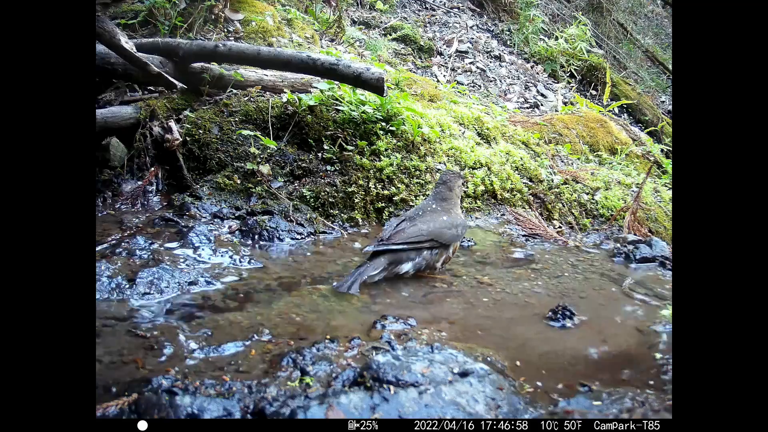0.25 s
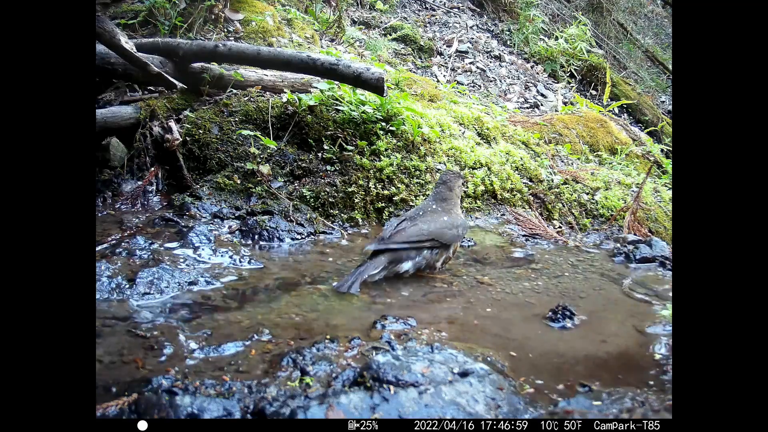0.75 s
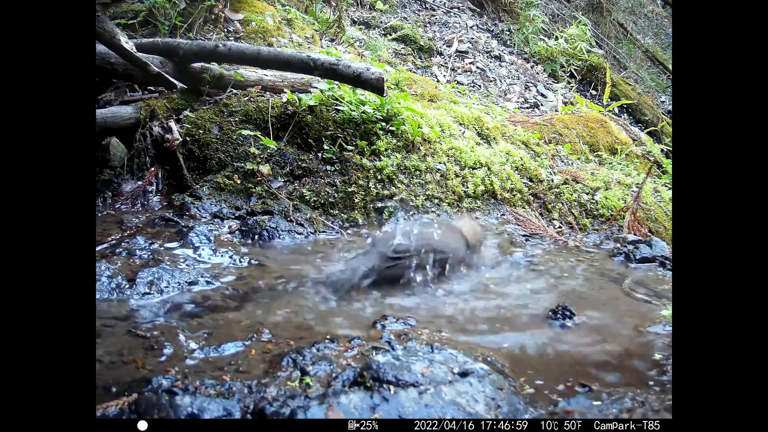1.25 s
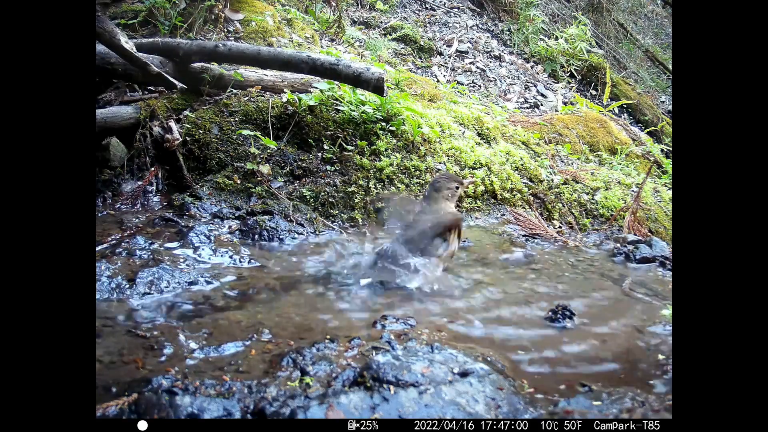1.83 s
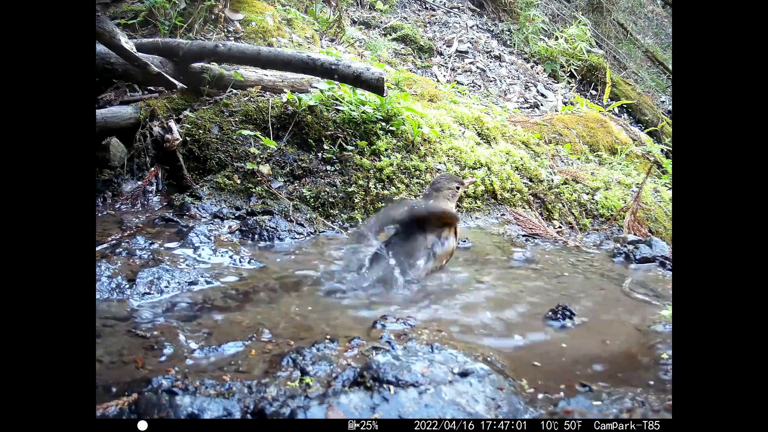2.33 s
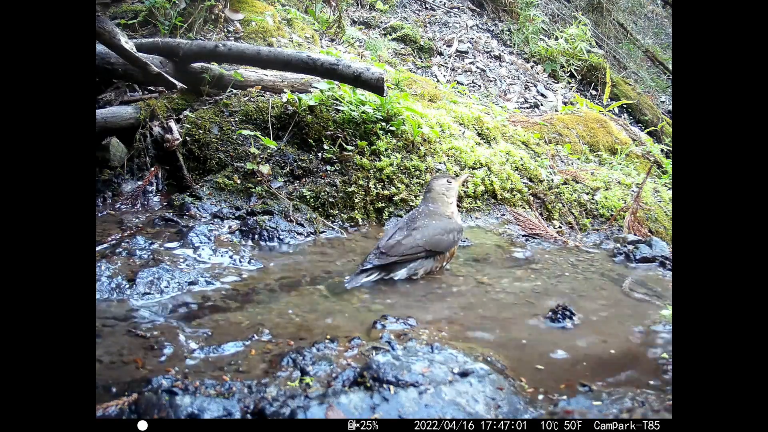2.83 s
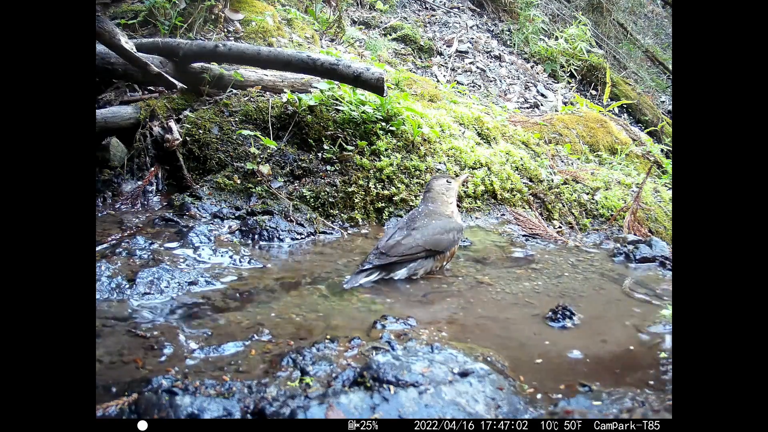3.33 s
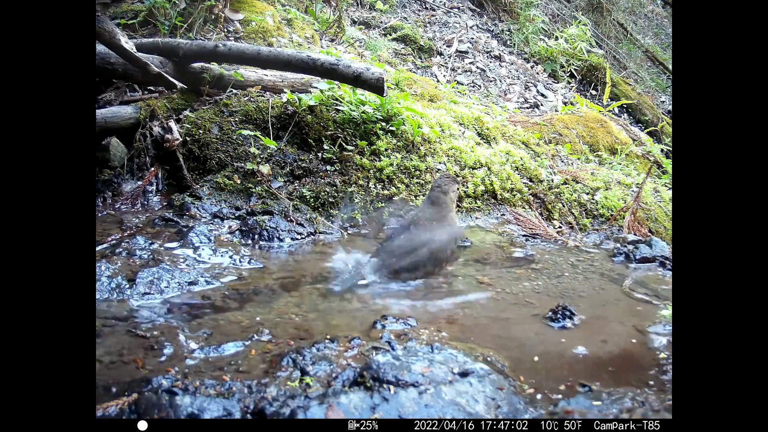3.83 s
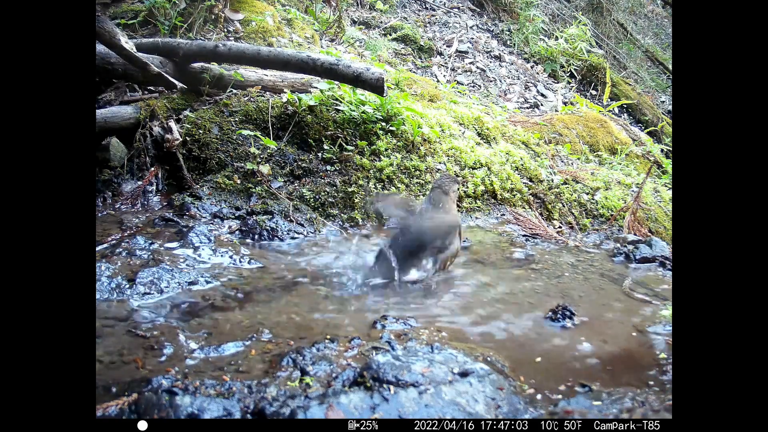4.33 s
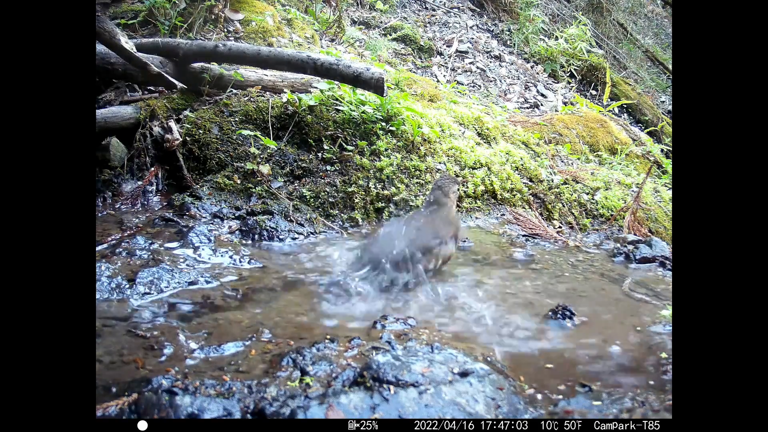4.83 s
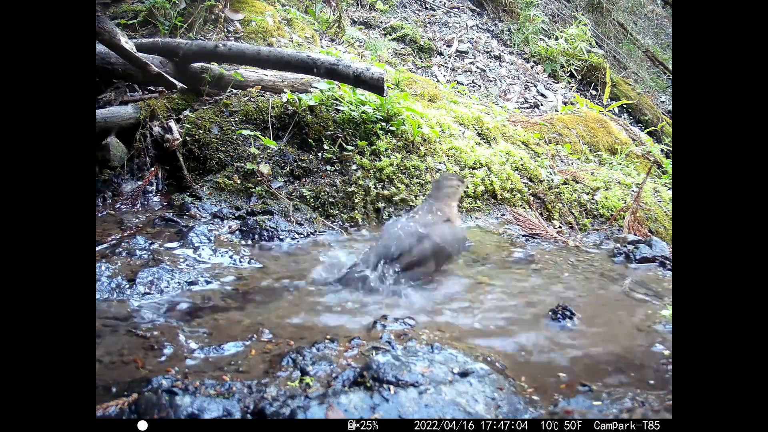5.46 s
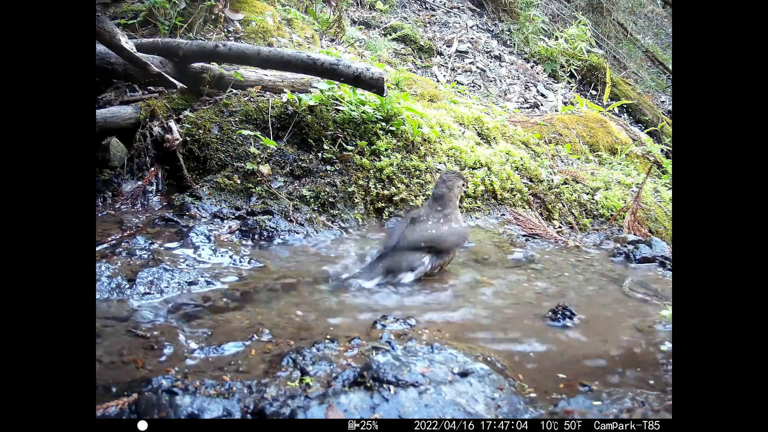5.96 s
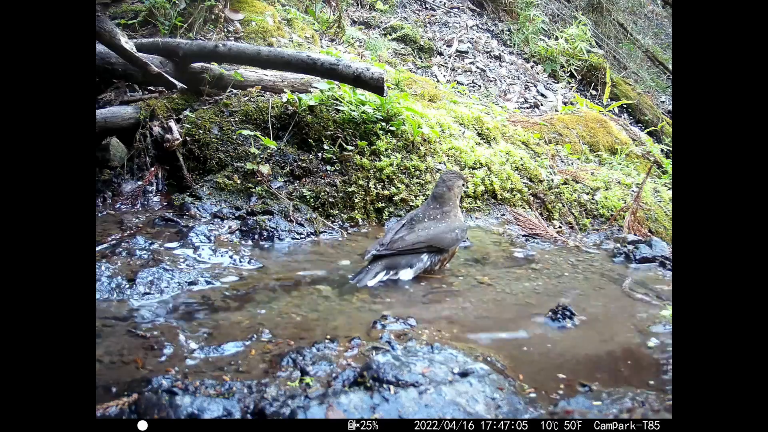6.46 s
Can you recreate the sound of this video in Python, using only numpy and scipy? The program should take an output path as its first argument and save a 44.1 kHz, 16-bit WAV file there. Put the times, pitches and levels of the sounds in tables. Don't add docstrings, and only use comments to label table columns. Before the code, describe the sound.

Heard from inside a small sealed plastic housing beside a forest pool: steady hiss and faint low rustle, with light muffled taps as a bird flicks water. A few hollow ringing plunks come around two seconds, then a near-quiet pause. Flicking resumes with more taps and patter, building into a rapid run of loud, boxy knocks and slops, then scattered last hits.

```python
import sys
import numpy as np
from scipy import signal
from scipy.fft import rfft, irfft
from scipy.io import wavfile

SR = 44100
rng = np.random.default_rng(int(sys.argv[2]) if len(sys.argv) > 2 else 0)


def log_audio(samples):
    frames = np.atleast_2d(samples).T
    limited = np.clip(frames, -1, 1)
    pcm = np.round(limited * 32767).astype(np.int16)
    wavfile.write(sys.argv[1], SR, pcm)


def ratio_of_db(decibels):
    return 10 ** (np.asarray(decibels, float) / 20)


N = 294878

# f/Hz, level/dB
SHELL = [(670, 3), (780, -7), (945, -1), (1090, 0.5), (1280, -4.5), (1660, 3.5), (1950, 6.5)]
# t/s, then level/dB of each lid mode from low to high
RINGS = [(0.901, -56.5, -82, -57, -53), (1.715, -64, -61, -53, -53.5), (1.802, -78, -46, -56, -49.5),
         (2.0096, -71, -35, -66, -62), (2.0563, -30.5, -30.5, -43.5, -60), (2.0929, -38.5, -30, -43, -65),
         (2.128, -46, -41, -66, -69), (4.214, -62, -52, -54, -70), (4.317, -63, -63, -52, -63),
         (2.7318, -62, -37, -44, -71), (4.761, -75, -47, -47, -41.5), (4.9886, -73, -34.5, -38.5, -69),
         (5.4226, -39, -33, -35.5, -52)]


def rms_one(x):
    return x / np.sqrt(np.mean(x ** 2) + 1e-20)


def peak_one(x):
    return x / np.max(np.abs(x))


def in_time(rows):
    s, value = np.transpose(rows)
    return np.interp(np.arange(N) / SR, s, value)


def band(x, low_hz, high_hz, order=2):
    return signal.sosfilt(signal.butter(order, [low_hz, high_hz], "band", fs=SR, output="sos"), x)


def drift(rate):
    knots = rng.standard_normal(int(N / SR * rate) + 2)
    return np.interp(np.arange(N) / SR * rate, np.arange(len(knots)), knots)


def coloured(spectrum):
    hz, level_db = np.transpose(spectrum)
    grid = np.maximum(np.arange(N // 2 + 1) * SR / N, 1)
    gain = ratio_of_db(np.interp(np.log(grid), np.log(hz), level_db))
    return rms_one(irfft(rfft(rng.standard_normal(N)) * gain, N))


def swell(t, rise, fall):
    return np.where(t < 0, ratio_of_db(-9 * (t / rise) ** 2), ratio_of_db(-9 * np.abs(t / fall) ** 1.2))


def hits():
    # peak t/s, level/dB, centre f/Hz, fall/ms, bright crack/dB
    knocks = [(3.9435, -33, 804, 0.85, -50), (5.102, -24, 850, 2.7, -44), (5.1493, -37.5, 1080, 4.7, -3.5),
              (5.154, -38.5, 925, 7, -18), (5.165, -37, 716, 4.8, -16), (5.178, -34, 990, 0.68, -40),
              (5.2077, -33, 930, 1.3, -14), (5.242, -29.5, 850, 2.4, -14), (5.4361, -25, 824, 6.4, -29),
              (5.4417, -21, 770, 6, -45), (5.4502, -18, 616, 0.88, -29), (5.4815, -36, 1090, 1.5, -13),
              (5.521, -32, 830, 1.4, -38), (5.6252, -31.5, 1090, 1.5, -21), (5.6696, -30.5, 914, 2.3, -19),
              (5.6724, -27, 796, 3.2, -13.5), (5.7093, -25.5, 906, 1.9, -10),
              (5.7688, -25.5, 903, 0.6, -18), (5.771, -29.5, 847, 3.3, -16), (5.8257, -20, 910, 1.5, -46),
              (6.1396, -32.5, 1020, 1.1, -17), (6.3483, -20.5, 1050, 0.63, -18),
              (6.3531, -31.5, 900, 0.61, -30), (6.3611, -28, 1090, 2.2, -17.5)]
    # peak t/s, level/dB,
    # centre f/Hz, fall/ms
    dull_taps = [(0.3415, -58.5, 950, 7.7), (.811, -47.5, 1060, 5.6), (0.8935, -51.5, 1120, 4.5),
                 (0.9127, -57, 950, 7.7), (1.058, -54, 1070, 7.8), (1.6267, -57.5, 870, 2.3),
                 (1.862, -57, 980, 1.1), (2.1452, -53, 794, 4.8), (2.1746, -52, 900, 5.6),
                 (2.3093, -47.5, 950, 0.64), (2.3389, -54, 970, 6.1), (2.704, -56.5, 1010, 6.2),
                 (2.8832, -49.5, 955, 0.6), (3.8014, -49, 1000, 1.8), (3.81, -47.5, 960, 2),
                 (3.933, -43.5, 910, 2.3), (3.9585, -45, 800, 1.5), (4.032, -54, 910, 6.6),
                 (4.39, -50, 870, 6.7), (1.343, -58, 980, 9.4), (.293, -62, 1050, 3), (3.4, -64, 960, 5.5),
                 (4.8908, -49.5, 1200, 1.4), (4.925, -43.5, 1170, 2.6), (4.932, -53, 1110, 7.9),
                   (5.0305, -49.5, 903, 14), (5.0895, -42, 830, 0.92), (5.1321, -40, 1030, 4.8),
                   (5.1573, -39, 990, 6.2), (5.28, -41, 950, 1.2), (5.3808, -52.5, 860, 7.5),
                   (5.4232, -31.5, 1000, 2), (5.4847, -26.5, 930, 4.4), (5.552, -38, 950, 0.72),
                   (5.6006, -41.5, 970, 1.4), (5.6181, -48, 990, 1.1), (5.633, -46, 950, 4.6),
                   (5.6553, -40, 960, 1.2), (5.856, -48.5, 870, 2.6), (5.8994, -48.5, 950, 5.8),
                   (6.1016, -37.5, 1030, 0.56), (6.1074, -39, 910, 0.71), (6.147, -40.5, 990, 1.1),
                   (6.371, -42, 970, 1.8), (6.208, -35.5, 950, 5.8), (6.067, -57, 950, 1.5),
                   (6.473, -52, 970, 1.4),
                 (.787, -58.5, 1030, 4.5), (.828, -67, 1050, 3.6), (5.866, -50, 800, 3.6),
                (.939, -63, 1010, 3.8), (.952, -64, 1050, 4.4), (.971, -59, 1100, 6), (1.037, -59, 1140, 4),
                (1.075, -68, 1030, 7), (.045, -64, 1090, 5.7), (1.299, -59.5, 930, 3.2),
                (1.313, -61, 1030, 4.5), (1.332, -67, 1000, 3), (1.44, -68, 1030, 6), (2.021, -48, 950, 3),
                (3.902, -60, 950, 2), (3.919, -57, 900, 4.9), (3.94, -51, 800, 1.2), (3.947, -52, 910, 4.6),
                (4.055, -65, 950, 2), (5.227, -53, 850, 2.8), (5.4585, -38, 695, 1.6),
                (4.243, -55, 950, 6.2), (4.256, -75, 950, 5.4), (4.291, -66, 930, 3.6),
                (4.37, -56, 1030, 4), (4.423, -53, 850, 3), (4.846, -50, 900, 7.5), (4.898, -55, 935, 5.1),
                (4.9885, -33, 1130, 2.4), (5.407, -57, 950, 3.7), (5.4465, -43, 900, 3),
                (5.526, -49, 950, 3.2),
                 (2.0575, -27, 1090, 0.88), (2.0945, -39.5, 1130, 2), (2.128, -43, 1070, 2.4),
               (2.7335, -34.5, 1050, 2), (2.7355, -40, 960, 1.9), (2.742, -44, 950, 3.1),
               (2.756, -63, 1000, 4), (2.768, -59, 1070, 3), (2.791, -62, 900, 4), (2.805, -56, 1010, 2.5),
               (2.826, -64, 1040, 4.2), (2.848, -59, 950, 3.3), (2.878, -55.5, 1020, 3.4),
               (2.897, -54, 1140, 4.7), (2.619, -59, 700, 1.8), (2.631, -66, 597, 1.7),
               (1.887, -58, 695, 1), (1.794, -59, 1110, 3.77), (1.94, -53.5, 1240, 3.5),
               (4.122, -56, 1250, 8.1), (4.159, -56, 1100, 3), (5.801, -72, 950, 2), (5.842, -69, 850, 2),
               (6.083, -55, 850, 4.6), (6.225, -52, 950, 2.8), (.918, -58.5, 1010, 3.7),
               (.33, -65, 990, 3.7), (.36, -71, 910, 4.7), (2.165, -52, 910, 6), (2.193, -56, 745, 4.9),
               (4.697, -55, 950, 3.4), (3.47, -68, 1000, 4), (5.298, -53, 950, 3), (5.338, -56, 1000, 4)]
    # peak t/s, level/dB, centre f/Hz, fall/ms
    spats = [(1.7183, -54.5, 854, 17), (3.8279, -46, 1120, 0.71), (3.9999, -51.5, 1290, 3.1),
             (4.3124, -46, 905, 8.7), (4.3249, -49.5, 954, 11), (4.4029, -42.5, 850, 4),
             (4.9156, -46, 1040, 2.1), (5.0401, -47, 1030, 3.3), (5.183, -42, 980, 0.8),
             (5.1876, -41, 864, 1.8), (5.265, -35, 890, 5.5), (5.4282, -37.5, 694, 4.6),
             (5.4697, -40, 574, 1.1), (5.4759, -43, 810, 0.86), (5.537, -39.5, 1030, 1.1),
             (5.546, -42, 960, 2.8), (5.7595, -52, 730, 3.5), (6.2532, -47.5, 1120, 1.2)]
    # peak t/s, level/dB, centre f/Hz, fall/ms, crack/dB
    pings = [
        (0.909, -51.5, 1240, 0.67, 0.5),
        (1.8066, -56, 1130, 5, 5),
        (2.1834, -51.5, 1000, 2.5, -7),
        (4.815, -53.5, 1010, 2.3, -3),
        (4.854, -63, 990, 3.3, 0),
        (4.9547, -47, 1150, 4, -7),
        (5.051, -50, 1180, 2.5, -2),
        (5.261, -41.5, 825, 3.3, -2.5),
        (5.8756, -50.5, 1000, 4.4, -4),
    ]
    # peak t/s, level/dB, centre f/Hz, fall/ms
    slops = [(0.068, -54, 1110, 5.9), (1.5505, -55.5, 970, 5.3), (1.8186, -49.5, 1050, 3.2),
             (1.9494, -58.5, 923, 16), (2.0346, -52, 905, 4), (2.0842, -54, 860, 6.1),
             (2.298, -59, 936, 13), (3.5376, -56, 1140, 4.3), (3.9058, -44.5, 990, 3.5),
             (3.9649, -50.5, 795, 4), (4.0195, -56, 960, 5.2), (4.224, -52, 885, 7.5),
             (4.233, -39.5, 1170, 1.8), (4.3175, -47, 1070, 3), (4.4404, -53.5, 956, 10),
             (4.667, -49.5, 913, 7.7), (4.8601, -45.5, 886, 5.2), (4.9607, -49, 950, 3.1),
             (5.0586, -47, 950, 4.1), (5.066, -51, 970, 5), (5.1729, -38.5, 820, 3.1),
             (5.2472, -39, 853, 9.7), (5.365, -56, 1060, 6.5), (5.4548, -37.5, 770, 4.9),
             (5.4925, -23.5, 939, 4), (5.497, -30, 880, 4.8), (5.565, -54, 970, 7), (6.551, -52, 1032, 8.7),
             (3.878, -61, 980, 4.9), (5.513, -35, 905, 8)]
    taps = dull_taps
    return ([(s, db, hz, 1.28, fall, crack) for s, db, hz, fall, crack in knocks]
            + [(s, db, hz, 1.25, fall, -18) for s, db, hz, fall in taps]
            + [(s, db, hz, 1.58, fall, -9) for s, db, hz, fall in spats]
            + [(s, db, hz, 6.2, fall, crack) for s, db, hz, fall, crack in pings]
            + [(s, db, hz, 0.77 * fall, fall, -20) for s, db, hz, fall in slops])


def drops(rows):
    stretch = 0.92
    focus = 0.28
    tail_db, tail_t60_s = -18, 0.037
    lead_db, lead_s, lead_pitch_share = -30, 0.0039, 0.618
    out, t = np.zeros(N + 4096), (np.arange(4096) - 1024) / SR
    mode_hz, mode_db = np.transpose(SHELL)
    chance = rng.standard_normal((len(rows), 3, len(SHELL)))
    for (s, peak_db, hz, rise_ms, fall_ms, crack_db), (luck, detune, turn) in zip(rows, chance):
        rise = stretch * max(rise_ms - 0.25, 0.5) / 1000
        fall = stretch * max(fall_ms - 0.25, 0.5) / 1000

        nearness = np.exp(-0.5 * (np.log(mode_hz / hz) / focus) ** 2)
        strength = ratio_of_db(mode_db + 10.9 * luck) * nearness
        phase = turn * np.clip((rise + fall) / 0.004 - 0.3, 0, 2)
        rung_hz = mode_hz * (1 + 0.065 * detune)
        modes = strength @ np.cos(2 * np.pi * rung_hz[:, None] * t + phase[:, None])
        own_tone = ratio_of_db(430 * (rise + fall)) * np.cos(2 * np.pi * hz * t)
        carrier = modes / np.sqrt(strength @ strength) + own_tone

        tail = ratio_of_db(tail_db - 60 * np.abs(t) / tail_t60_s) * (t > 0)
        lead_tone = np.cos(2 * np.pi * lead_pitch_share * hz * t)
        lead = ratio_of_db(lead_db) * lead_tone * swell(t + rise, lead_s, rise)
        body = peak_one(carrier * (swell(t, rise, fall) + tail)) + lead

        bright = np.cos(2 * np.pi * 2120 * (1 + 0.11 * detune[0]) * t + turn[0])
        bright += 1.42 * np.cos(2 * np.pi * 2720 * t + turn[1])
        bright += 1.22 * np.cos(2 * np.pi * 3600 * (1 + 0.13 * detune[1]) * t + turn[2])
        crack = peak_one(bright * swell(t + 0.5 * rise, 0.42 * rise, 0.71 * fall))

        at = int((s - 0.0005) * SR)
        out[at:at + 4096] += ratio_of_db(peak_db + 0.5) * (body + ratio_of_db(crack_db + 9.5) * crack)
    return out[1024:N + 1024]


def port(x):
    return band(x, 436, 1614) + ratio_of_db(-15.5) * x


def rings():
    lid_hz = (686, 950, 1250, 1656)
    lid_t60_s = (0.054, 0.039, 0.04, 0.041)
    rise_s, damped_s, tick_db = 0.0013, 0.028, -18
    out, t = np.zeros(N), np.arange(3000) / SR
    tones = np.sin(2 * np.pi * np.array(lid_hz)[:, None] * t)
    decay = ratio_of_db(-60 * t / np.array(lid_t60_s)[:, None])
    shape = (1 - np.exp(-t / rise_s)) * decay / (1 + (t / damped_s) ** 8)
    tick = peak_one(band(1.0 * (t == 0), 680, 2800))
    for s, *mode_db in RINGS:
        at = int(s * SR)
        out[at:at + len(t)] -= ratio_of_db(mode_db) @ (tones * shape) + ratio_of_db(max(mode_db) + tick_db) * tick
    return signal.sosfilt(signal.butter(4, 520, "high", fs=SR, output="sos"), out)


def bubbles():
    # peak
    # t/s, level/dB, f/Hz, fall/ms
    small_tones = [(0.906, -63, 1940, 7.7), (.905, -63, 2280, 5), (.375, -68, 1400, 5),
                   (4.432, -64, 1680, 4.3), (5.491, -61, 2550, 1.7), (5.258, -51, 1930, 4.4),
                   (5.152, -54, 1990, 3.2), (1.208, -62.5, 2630, 3.8), (1.715, -64, 2700, 3.3),
                   (1.808, -66, 2700, 4.9), (1.808, -63, 3470, 4), (4.215, -59.5, 1680, 6.2),
                   (4.323, -56, 1790, 3.1), (4.7668, -44, 1690, 3.2), (4.782, -61, 1690, 8),
                   (4.815, -62, 2630, 4), (4.853, -63, 2740, 5), (4.952, -55, 2680, 3.6),
                   (5.05, -55.5, 2660, 3), (5.461, -57, 2740, 2), (5.482, -43.5, 2000, 1.6)]
    # peak t/s, level/dB, f/Hz, fall/ms
    gulps = [(0.2, -70, 130, 25), (0.69, -71, 106, 22), (0.85, -69, 110, 19), (1.11, -67, 240, 32),
             (1.461, -68, 100, 58), (.195, -67, 204, 6.6), (0.76, -64.5, 280, 4.6), (4.8, -62, 285, 10),
             (2.75, -65, 274, 9.3), (1.6, -70, 84, 23), (2.072, -64.5, 200, 59), (2.53, -75, 115, 25),
             (5.454, -46, 90, 20)]
    rise_share, glide_per_s = 0.54, 2.0
    out, t = np.zeros(N), (np.arange(8192) - 4096) / SR
    for s, peak_db, hz, fall_ms in small_tones + gulps:
        at, fall = int(s * SR) - 4096, fall_ms / 1000
        tone = np.cos(2 * np.pi * hz * t * (1 + glide_per_s * t))
        out[at:at + 8192] += ratio_of_db(peak_db) * tone * swell(t, rise_share * fall, fall)
    return out


def thuds():
    # peak t/s, level/dB, f/Hz
    pushes = [(1.503, -58.5, 195), (2.059, -48.5, 273), (2.34, -59, 128), (2.739, -52.5, 242),
              (3.963, -50, 322), (4.237, -60, 260), (4.994, -50, 214), (5.103, -38, 212), (5.178, -53, 192),
              (5.208, -54, 260.0), (5.241, -45.5, 330), (5.438, -37, 100), (5.502, -45, 226),
              (5.551, -58, 238), (5.672, -41, 335), (5.706, -52, 230.0), (5.77, -48, 310),
              (5.827, -39.5, 248), (6.101, -47.5, 372), (6.14, -53.5, 286), (6.362, -45, 263),
              (6.665, -58, 171),
              (5.436, -28.5, 400),
        (5.45, -31.5, 382),
        (5.459, -42, 295),
    ]
    rise_cycles, fall_cycles = 0.23, 0.71
    out, t = np.zeros(N + 4096), (np.arange(4096) - 1024) / SR
    for s, peak_db, hz in pushes:
        at = int(s * SR)
        push = np.sin(2 * np.pi * hz * t) * swell(t, rise_cycles / hz, fall_cycles / hz)
        out[at:at + 4096] += ratio_of_db(peak_db) * push
    return out[1024:N + 1024]


def spray_gain():
    # t/s, spray level/dB
    vigour = [(0, -84.5), (.34, -77), (.5, -81), (.77, -84), (.85, -74.5), (1.15, -77), (1.5, -77),
              (2.1, -71.5), (2.35, -79), (2.43, -83), (2.8, -81), (3.0, -81.5), (3.76, -92), (3.82, -71.5),
              (4.42, -69.5), (4.52, -75.5), (5.3, -62.5), (6.68, -74.5)]
    scatter_db, follows, scatter_t60_s = -54, 0.35, 0.36
    events = [(row[0], row[1]) for row in hits()] + [(row[0], max(row[1:])) for row in RINGS]
    s, db = np.transpose(events)
    thrown = np.zeros(N)
    thrown[(s * SR).astype(int)] = ratio_of_db(2 * (scatter_db - 18 + follows * (db + 47.5)))
    r = ratio_of_db(-120 / (scatter_t60_s * SR))
    falling_back = signal.lfilter([1], [1, -r], thrown + 1e-18)
    return np.sqrt(ratio_of_db(2 * in_time(vigour)) + falling_back)


def spray():
    port_hz = (709, 1343)
    per_s, spread_db, t60_s, direct = 700, 3.5, 0.04, 0.4
    sizes = ratio_of_db(spread_db * np.minimum(rng.exponential(1, N), 2.5)) * rng.choice([-1, 1], N)
    lands = rng.random(N) < per_s * ratio_of_db(6 * drift(30)) / SR
    ticks = sizes * lands + 1e-18
    dealt = rng.integers(0, len(SHELL), N)
    r = ratio_of_db(-60 / (t60_s * SR))
    ringing = np.zeros(N)
    for k, (hz, level_db) in enumerate(SHELL):
        w = 2 * np.pi * hz / SR
        resonator = [1, -2 * r * np.cos(w), r * r]
        ringing += ratio_of_db(level_db) * signal.lfilter([0, np.sin(w)], resonator, ticks * (dealt == k))
    patter = rms_one(ringing) + direct * rms_one(band(ticks, *port_hz))
    return spray_gain() * rms_one(band(patter, *port_hz, order=3))


def air():
    # t/s, level/dB
    rustle = [(0, -79), (.5, -82.5), (.8, -81), (1.1, -80.5), (1.3, -78), (1.5, -78.5), (1.8, -76.5),
              (2.2, -77), (2.6, -78.5), (3.2, -87.5), (3.8, -79), (4.3, -77.5), (4.68, -80), (5.2, -71.5),
              (5.9, -78), (6.4, -74), (6.68, -77)]
    lumps_db = 3 * (drift(30) + 0.5 * drift(6))
    return ratio_of_db(in_time(rustle) + lumps_db) * rms_one(band(rng.standard_normal(N), 40, 200))


def scene():
    return (port(drops(hits())) + rings() + bubbles() + thuds() + spray() + air())[None]


def roll_off(x):
    return signal.sosfilt(signal.butter(12, 15530, fs=SR, output="sos"), x)


def record(dry):
    # f/Hz, level per Hz/dB
    hiss = [(20, -1), (130, -7), (250, -6), (450, -6), (620, -12.5), (980, -5.5), (1250, -16.5),
            (1650, -14.5), (2000, -6), (2600, -5.5), (8000, -5), (13000, -7), (15600, -7.5), (17000, -81)]
    mix = dry[0] + ratio_of_db(-66.5 + 0.5 * drift(16)) * coloured(hiss)
    return roll_off(mix)


dry = scene()
out = record(dry)
log_audio(out)
```